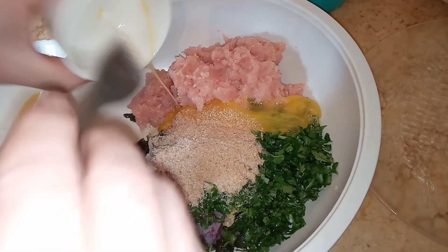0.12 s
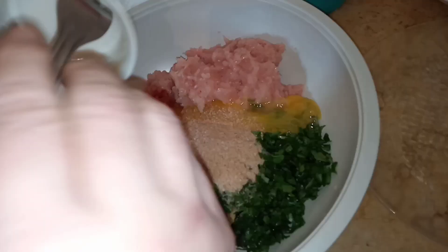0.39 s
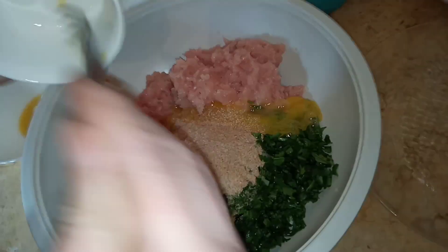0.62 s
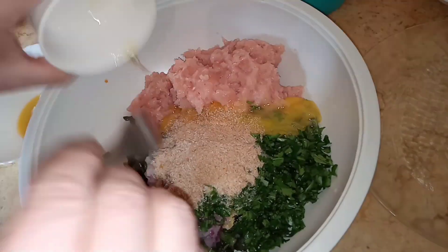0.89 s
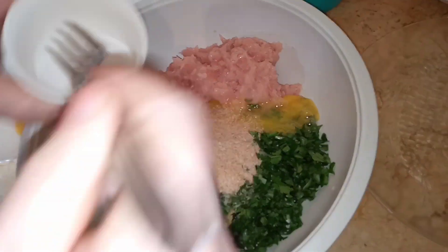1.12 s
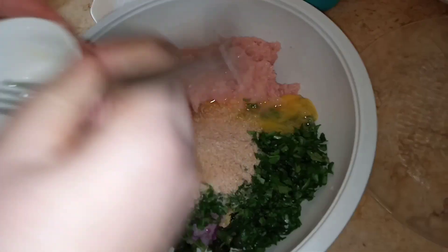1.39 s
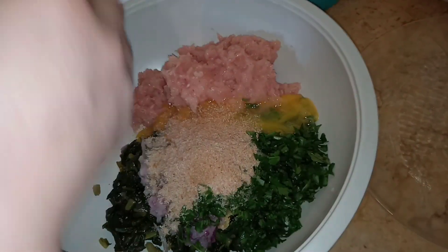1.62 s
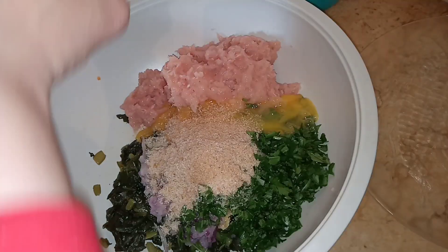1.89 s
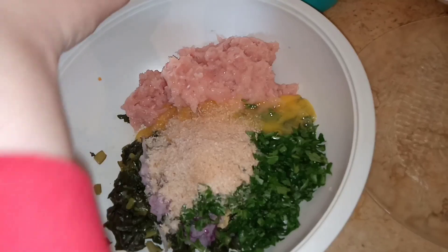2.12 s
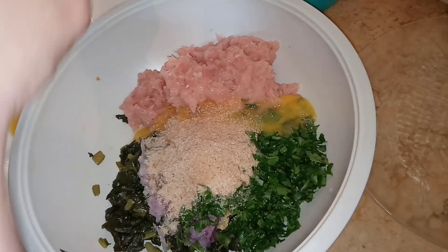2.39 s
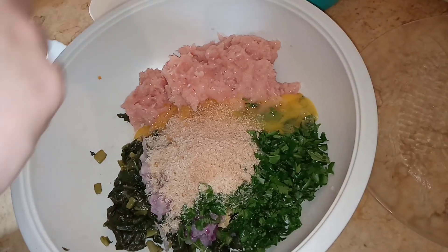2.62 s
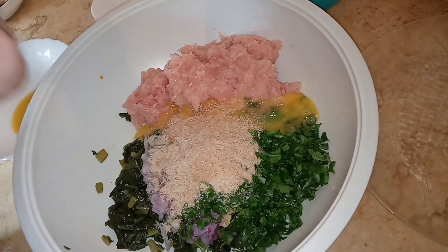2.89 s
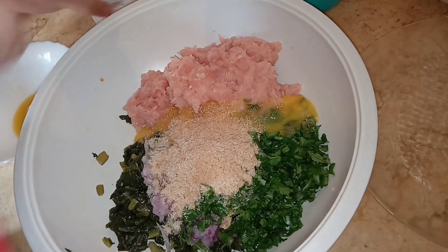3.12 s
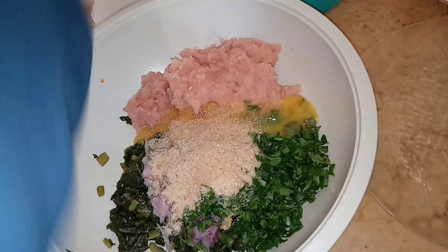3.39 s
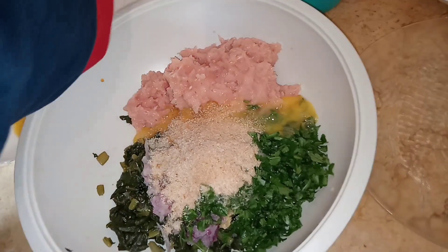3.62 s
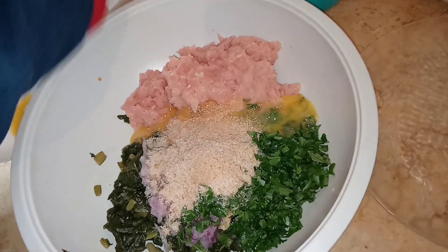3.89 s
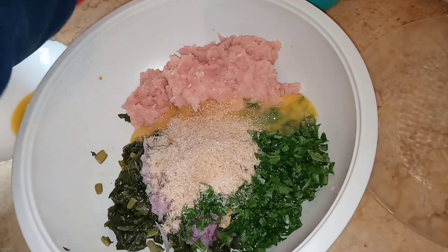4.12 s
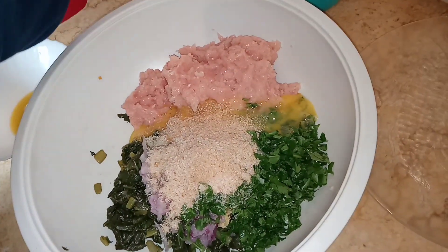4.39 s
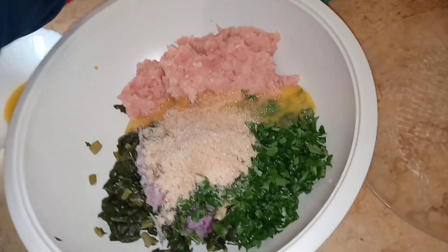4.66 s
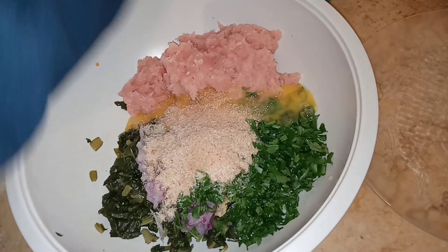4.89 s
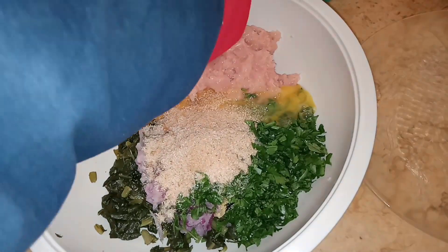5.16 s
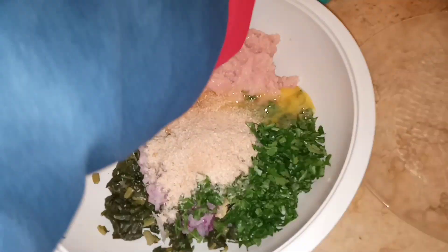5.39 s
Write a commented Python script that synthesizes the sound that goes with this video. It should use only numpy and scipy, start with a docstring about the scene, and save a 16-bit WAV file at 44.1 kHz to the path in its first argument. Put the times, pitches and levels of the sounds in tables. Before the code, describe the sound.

A fork taps and clatters in a ceramic cup, then after a quiet gap dishes knock, scrape and crash on a kitchen counter.

```python
"""Crockery on a kitchen counter

A small hard kitchen heard by a phone on the counter: a fork taps and drops into a ceramic cup, a glass is
set down, a lidded jar is knocked about, a dish is dragged and squeals, a plate clatters down.
Blows are noise bursts plus fading sine modes; rubbing is a train of slips through the same modes.
Room noise is shaped noise; an appliance hums in wavering sines, and a low tone swells and fades."""
import sys
import numpy as np
from scipy import signal
from scipy.fft import rfft, irfft
from scipy.io import wavfile
from scipy.ndimage import uniform_filter1d, minimum_filter1d

SR = 44100
rng = np.random.default_rng(int(sys.argv[2]) if len(sys.argv) > 2 else 0)


def to_linear_factor(level_db):
    """Convert decibel levels (scalar or array-like) to linear amplitude factors."""
    exponent = np.asarray(level_db, float) / 20
    return 10 ** exponent


def wav_record(signal):
    """Record a signal, one row per channel, as 16-bit PCM in the file named by sys.argv[1]."""
    frames = np.transpose(np.atleast_2d(signal))
    bounded = np.clip(frames, -1, 1)
    # unit amplitude maps onto the largest positive 16-bit level
    quanta = np.round(bounded * 32767).astype(np.int16)
    wavfile.write(sys.argv[1], SR, quanta)


N = 243431
T = np.arange(N) / SR

# Ceramic cup resonances. Each row: mean frequency in Hz, relative level in dB, undamped t60 in s.
CUP_MODES = [(1660, -2.5, 0.057), (2420, -3.5, 0.37), (2530, -6.5, 0.12), (5600, -19.5, 0.25),
             (6000, -12, 0.22), (7100, -21, 0.23), (8786, -17, 0.074), (9700, -29.5, 0.16),
             (15430, -26, .08)]


def unit(x):
    """Scaled to rms 1."""
    return x / np.sqrt(np.mean(x ** 2))


def on_log(points, hz):
    """Value of (Hz, value) points at hz, interpolated over log frequency."""
    f, v = np.transpose(points)
    return np.interp(np.log(np.maximum(hz, 1)), np.log(f), v)


def conv(x, h):
    """Convolution cut to the length of x."""
    return signal.fftconvolve(x, h)[:len(x)]


def walk(rate_hz):
    """Random levels held for 1 / rate_hz and slewed twice; rms 1."""
    k = int(SR / rate_hz)
    steps = np.repeat(rng.standard_normal(N // k + 3), k)
    slewed = uniform_filter1d(uniform_filter1d(steps, k), k)
    return unit(slewed[k:N + k])


def room_noise():
    """Soft steady room noise: white noise shaped in the spectrum, its level wavering."""
    # Spectrum. Each row: frequency in Hz, relative density in dB per Hz.
    air_spectrum = [(25, -33), (35, -34), (50, -12.5), (65, -16.5), (85, -1.5), (220, -5.5), (310, -3.5),
                    (450, -9.5), (950, -11.5), (1250, -8.5), (1550, -13), (3150, -20), (3450, -29.5),
                    (4600, -38.5), (5500, -52), (6300, -48), (7600, -52.5), (8500, -47), (9300, -59.5),
                    (16000, -61)]
    # Mean level. Each row: time in s, level in dB.
    air_level = [(0.0, -48), (0.5, -45.5), (3.8, -43.5), (5.52, -44.5)]
    hz = np.arange(N // 2 + 1) * SR / N
    white = rfft(rng.standard_normal(N))
    air = unit(irfft(white * to_linear_factor(on_log(air_spectrum, hz)), N))
    return air * to_linear_factor(np.interp(T, *np.transpose(air_level)) + 1.4 * walk(5.48))


def appliance_hum():
    """Motor hum: sine lines wavering in level and phase."""
    # Hum lines. Each row: frequency in Hz, mean level in dB rms.
    hum_lines = [(147.5, -55), (294, -55.5), (490, -64)]
    out = np.zeros(N)
    for hz, db in hum_lines:
        level = np.sqrt(2) * to_linear_factor(db + 1.5 * walk(5))
        out += level * np.sin(2 * np.pi * hz * T + .4 * walk(4))
    return out


def low_tone():
    """A sinking, wavering low tone and its octave, in Gaussian swells."""
    # Swells. Each row: peak time in s, half width in s (to 1 / e), level in dB.
    swells = [(.05, 0.39, -55.5), (.8, 0.35, -57), (2.0, 0.44, -48.5), (3.15, 0.13, -54), (3.95, 0.4, -51),
              (4.5, 0.22, -65), (4.9, 0.18, -56)]
    # Mean pitch. Each row: time in s, frequency in Hz.
    pitch = [(0, 96), (1.5, 95.4), (3.0, 83.9), (5.52, 69.05)]
    hz = np.interp(T, *np.transpose(pitch)) + 1.176 * walk(1.7)
    phase = 2 * np.pi * np.cumsum(hz) / SR
    swell = sum(to_linear_factor(db) * np.exp(-((T - s) / half_s) ** 2) for s, half_s, db in swells)
    swell = swell * to_linear_factor(2 * walk(9))
    return np.sqrt(2) * swell * (np.sin(phase) + to_linear_factor(-10) * np.sin(2 * phase))


def colour(points, tilt_db=0., size=2048):
    """Causal response with the given spectrum, from the folded cepstrum; energy 1."""
    hz = np.arange(size // 2 + 1) * SR / size
    db = on_log(points, hz) + tilt_db * np.log2(np.clip(hz, 200, 16000) / 2200)
    cep = irfft(db * np.log(10) / 20)
    cep[1:size // 2] *= 2
    cep[size // 2 + 1:] = 0
    h = irfft(np.exp(rfft(cep)))
    return h / np.sqrt(np.sum(h ** 2))


def ring(modes, gain_db, rise_s=0.0038):
    """Sum of fading sines that build up over the contact time."""
    hz, db, t60_s = np.transpose(modes)[:, :, None]
    t = T[:SR // 2]
    sines = to_linear_factor(db + gain_db[:, None] - 60 * t / t60_s) * np.sin(2 * np.pi * hz * t)
    return np.sum(sines, axis=0) * np.sin(np.pi / 2 * np.minimum(t / rise_s, 1)) ** 2


def struck(blows, modes, knock, rise_s, crack_t60_s, body_t60_s, body_db, ring_db, damp_db):
    """Each blow: a short crack, a dull knock dying in the body, and modes woken unevenly by where it lands."""
    detune, scatter_db = 0.0041, 3  # spread between blows: pitch as a fraction, level of each mode
    soft_db, soft_loss = -28, 0.25  # blows under soft_db ring less, by soft_loss dB per dB
    out, t = np.zeros(N + SR), T[:SR // 2]
    hz, db, _ = np.transpose(modes)
    times = np.transpose(blows)[0]
    for s, level_db, tilt_db, best_hz, best_db in blows:
        crack = to_linear_factor(-60 * t / crack_t60_s)
        body = to_linear_factor(body_db - 60 * t / body_t60_s)
        push = rng.standard_normal(len(t)) * (crack + body)
        thud = conv(push * np.minimum(t / rise_s, 1), colour(knock, tilt_db)) / 2

        favour_db = best_db * np.exp(-(np.log2(hz / best_hz) / .08) ** 2)
        wake_db = tilt_db * np.log2(hz / 2200) + favour_db
        wake_db = wake_db + soft_loss * min(level_db - soft_db, 0)
        wake_db = wake_db + scatter_db * rng.standard_normal(len(modes))
        shift = np.ones((len(modes), 3))
        shift[:, 0] += detune * rng.standard_normal(len(modes))
        tone = ring(modes * shift, wake_db, 2 * rise_s)

        # every later contact takes some of this ringing away
        later = np.searchsorted(times[times > s], s + t).astype(float)
        tone = tone * to_linear_factor(-damp_db * uniform_filter1d(later, size=128))
        tone = tone / np.sqrt(np.sum(to_linear_factor(db) ** 2))
        i = int(s * SR)
        out[i:i + len(t)] += to_linear_factor(level_db) * (thud + to_linear_factor(ring_db) * tone)
    return out[:N]


def cup():
    """Ceramic cup: blows wake its modes."""
    # Each row: start in s, level in dB, brightness in dB per octave, favoured pitch in Hz, favour in dB.
    cup_blows = [(.402, -22.5, 5.5, 2410, 4), (.4786, -11, 0, 2610, 9), (.4834, -13.5, -3.5, 2410, -1),
                 (.5114, -35, -11.5, 2420, -3)]
    # Knock through body and counter. Each row: frequency in Hz, relative density in dB per Hz.
    cup_knock = [(88, -51), (150, -17), (333, -24), (879, -24.5), (2150, -8), (2460, 3), (2930, -16),
                 (8540, -26.5), (12000, -36), (15600, -39)]
    return struck(cup_blows, CUP_MODES, cup_knock, rise_s=0.00076, crack_t60_s=0.032, body_t60_s=0.047,
                  body_db=-14.5, ring_db=-18.5, damp_db=1.7)


def counter():
    """Short low booms of the worktop, each a pair of fading sines; three of the four lie under blows."""
    # Each row: start in s, frequency in Hz, level in dB, t60 in s.
    thumps = [(.48, 272, -28, 0.076), (1.327, 70, -35, 0.072), (1.955, 347, -34, 0.13),
              (5.357, 113, -18.5, 0.042)]
    out = np.zeros(N + SR)
    for s, hz, db, t60_s in thumps:
        pair = [(hz, db, t60_s), (1.21 * hz, db - 10.0, t60_s)]
        i = int(s * SR)
        out[i:i + SR // 2] += ring(pair, np.zeros(2), 0.0053)
    return out[:N]


def room(x):
    """Dense reflections from hard walls, each octave fading at its own rate; energy 1."""
    # Each row: frequency in Hz, t60 in s.
    room_t60 = [(300, 0.61), (1000, 0.66), (2500, 0.55), (6000, 0.43), (14000, 0.23)]
    gap_s, rise_s = 0.0038, 0.0049
    t, tail = T[:int(.7 * SR)], 0
    for hz in 125 * 2. ** np.arange(8):
        edges_hz = [hz / np.sqrt(2), min(hz * np.sqrt(2), 20000)]
        band = signal.butter(2, edges_hz, "band", fs=SR, output="sos")
        noise = signal.sosfilt(band, rng.standard_normal(len(t)))
        tail = tail + noise * to_linear_factor(-60 * t / on_log(room_t60, hz))
    tail = tail * np.clip((t - gap_s) / rise_s, 0, 1)
    return conv(x, tail / np.sqrt(np.sum(tail ** 2)))


def fork():
    """Fork rattling in the cup: blows wake the modes of both."""
    # Each row: start in s, level in dB, brightness in dB per octave, favoured pitch in Hz, favour in dB.
    fork_blows = [(1.3151, -23, 0.5, 1179, 12), (1.3242, -9, 6, 1534, 33), (1.3343, -11, -1.1, 2700, 9),
                  (1.3517, -12, 1.5, 2700, 3), (1.3721, -18, 0.5, 5992, 6), (1.5825, -35.5, -1, 8500, 3),
                  (1.6816, -33.5, -3.5, 6000, -6), (1.7562, -32, -2.5, 8786, 6), (1.766, -37, -1, 6000, 3),
                  (1.7746, -33.5, -1.5, 1660, 21)]
    # Each row: mean frequency in Hz, relative level in dB, undamped t60 in s.
    fork_modes = [(1179, 6, 0.13), (1534, -13, 0.052), (1790, -7, 0.09), (2401, 9, 0.22), (2740, -1, 0.2),
                  (2834, -3, 0.12), (2990, -15, 0.058), (3030, 2.5, 0.2), (3284, -6, 0.17),
                  (4700, -13, .15), (5992, -12, 0.24), (8500, -8, 0.067), (10430, -25, 0.16),
                  (14600, -22, 0.093), (14900, -25, .1)]
    # Knock. Each row: frequency in Hz, relative density in dB per Hz.
    fork_knock = [(59, -66), (100, -23.5), (881, -12), (1160, -8.5), (1340, -20), (1490, -6.5), (1890, -9),
                  (2480, -0.5), (3630, -18.5), (8630, -31.5), (9390, -49), (15600, -56)]
    return struck(fork_blows, fork_modes + CUP_MODES, fork_knock, rise_s=0.0011, crack_t60_s=0.037,
                  body_t60_s=0.24, body_db=-13.5, ring_db=-10.5, damp_db=5.3)


def glass():
    """Glass set down: a few close blows wake its modes."""
    # Each row: start in s, level in dB, brightness in dB per octave, favoured pitch in Hz, favour in dB.
    glass_blows = [(3.742, -15, .1, 7031, -1), (3.7514, -17.5, 0.7, 3429, -4), (3.763, -32, -.6, 3095, 1),
                   (3.798, -28.5, -0.6, 1650, -4)]
    # Each row: mean frequency in Hz, relative level in dB, undamped t60 in s.
    glass_modes = [(623, -1, 0.13), (1390, -12, 0.12), (1650, 4, .12), (2480, 0.5, 0.078),
                   (3095, -10, 0.068), (3429, 1.5, 0.12), (4753, -5.5, 0.15), (4960, -17, 0.24),
                   (7031, -14.5, 0.29), (9200, -17.5, 0.076), (10250, -35, 0.15), (11700, -34, 0.073),
                   (12900, -34, .1), (14500, -34, .08)]
    # Knock. Each row: frequency in Hz, relative density in dB per Hz.
    glass_knock = [(180, -43), (300, -8.5), (1040, -11.5), (1160, -13), (1420, 0), (2940, -7.5),
                   (3470, -13), (5690, -30), (7170, -33), (15600, -84)]
    return struck(glass_blows, glass_modes, glass_knock, rise_s=0.00064, crack_t60_s=0.045, body_t60_s=0.2,
                  body_db=-11, ring_db=-7.5, damp_db=3.1)


def rubbed(strokes, modes, knock, slips_per_s, spread_db, patchy_db, split_hz, low_db, high_db):
    """Dense uneven slips, bunched in patches, knock the body and keep low and high modes singing unequally."""
    chance = rng.random((2, N))
    size = to_linear_factor(-spread_db * np.log(1 - .97 * chance[1]))
    slips = unit((chance[0] < slips_per_s / SR) * size * to_linear_factor(patchy_db * walk(120)))
    press = np.zeros(N)
    for s, length_s, start_db, end_db in strokes:
        db = start_db + (end_db - start_db) * np.clip((T - s) / length_s, 0, 1)
        press += to_linear_factor(db) * ((T >= s) & (T < s + length_s))
    drive = slips * press

    low = np.transpose(modes)[0] < split_hz
    scale = np.sqrt(np.sum(ring(np.array(modes)[low], np.zeros(low.sum())) ** 2))
    singing = ring(modes, np.where(low, low_db, high_db)) / scale
    return conv(drive, colour(knock)) + conv(drive, singing)


def jar():
    """Lidded jar knocked about: blows and short rattles through the same modes."""
    # Each row: start in s, level in dB, brightness in dB per octave, favoured pitch in Hz, favour in dB.
    jar_blows = [(4.3468, 2, 1.3, 4768, 32), (4.3873, -14, -1.5, 1740, 18.5), (4.4407, -2, 4, 2600, 4),
                 (4.4478, -18, 9, 3360, 5), (4.566, -7.5, -2.5, 1810, 12.5), (4.5744, -9, -2, 1810, 3),
                 (4.6524, -8.5, -2, 3120, 14), (4.66, -10.5, -2, 2124, 19), (4.7003, -17.5, -1.5, 7440, 4),
                 (4.7337, -1, -0.3, 2374, 12), (4.741, -2.5, -0.5, 2556, 17), (4.758, -21, -3, 2374, -3),
                 (4.8225, -10.5, -1.5, 1430, -2), (4.8443, -15.5, 3.5, 10200, 5)]
    # Each row: start in s, length in s, level at the start in dB, level at the end in dB.
    jar_rattle = [(4.356, 0.066, -21, -26), (4.655, 0.079, -25.5, -20.5), (4.745, 0.1, -22, -43),
                  (4.822, 0.074, -26.5, -42.5)]
    # Each row: mean frequency in Hz, relative level in dB, undamped t60 in s.
    jar_modes = [(1430, -5.5, 0.13), (1740, -2.5, .2), (1769, 0, 0.24), (1810, 6, 0.086),
                 (2124, 2.5, 0.095), (2374, -1, 0.095), (2600, 3.5, 0.083), (2880, -1, 0.045),
                 (3120, -2, 0.066), (3360, 2.5, 0.18), (4768, -26, 0.16), (7040, -23, 0.11),
                 (7440, -26.5, 0.087), (10200, -32, 0.12), (12900, -37, .1)]
    # Knock through body and counter. Each row: frequency in Hz, relative density in dB per Hz.
    jar_knock = [(100, -31), (500, -13), (980, -16), (1430, -1), (2530, -2), (3500, -10), (4200, -25),
                 (5200, -27), (5900, -45.5), (7400, -31.5), (8800, -49.5), (10300, -52.5), (12000, -62),
                 (15600, -54.5)]
    blows = struck(jar_blows, jar_modes, jar_knock, rise_s=0.00061, crack_t60_s=0.027, body_t60_s=0.2,
                   body_db=-14.5, ring_db=-16, damp_db=7.1)
    return blows + rubbed(jar_rattle, jar_modes, jar_knock, slips_per_s=2500, spread_db=1.8, patchy_db=3.3,
                          split_hz=4000, low_db=-4.5, high_db=-10)


def squeal():
    """Slips locked onto one dish mode, given as a clean faded sine."""
    # One row: start in s, length in s, frequency in Hz, level in dB rms.
    squeal_tone = (5.285, .07, 2480, -23)
    start_s, length_s, hz, db = squeal_tone
    rise_s, fall_s = .025, .006
    fade = np.clip(np.minimum((T - start_s) / rise_s, (start_s + length_s - T) / fall_s), 0, 1)
    return np.sqrt(2) * fade * to_linear_factor(db) * np.sin(2 * np.pi * hz * T)


def dish():
    """Dish dragged over the counter: blows, slips through the same modes, and a squeal."""
    # Each row: start in s, level in dB, brightness in dB per octave, favoured pitch in Hz, favour in dB.
    dish_blows = [(5.0357, -17.5, -1.2, 2470, -7), (5.044, -5.5, 1.6, 6800, 7.5),
                  (5.0528, -8, 1.7, 8490, 8.5), (5.0789, -9.5, -1.3, 6800, 9),
                  (5.0935, -10.5, -1.4, 2470, -2), (5.1148, -13.5, -1, 5840, 21),
                  (5.1304, -10, -1.7, 2470, 12.5), (5.1497, -11, -1.3, 8490, 8),
                  (5.158, -5.5, 0.4, 2470, 6.5), (5.1704, -7.5, 0.23, 2470, 2.5),
                  (5.1977, -21.5, 1.4, 8490, 21)]
    # Each row: start in s, length in s, level at the start in dB, level at the end in dB.
    dish_drag = [(5.05, .16, -25.5, -18.5), (5.21, 0.11, -23.5, -35.5)]
    # Each row: mean frequency in Hz, relative level in dB, undamped t60 in s.
    dish_modes = [(1713, -16, 0.046), (1890, -10, 0.12), (2170, -2.5, 0.086), (2470, 3, 0.14),
                  (3120, -10.5, 0.094), (3860, -24, 0.09), (3930, -27, 0.18), (5040, -28, 0.066),
                  (5400, -28, 0.1), (5580, -36, 0.12), (5840, -27.5, 0.33), (6800, -20, 0.07),
                  (7740, -33, 0.059), (8490, -22, 0.085), (9500, -39, .08), (10260, -26, 0.064),
                  (10400, -28, 0.05), (10500, -31, .06), (12700, -32.5, .07), (12750, -39, .07),
                  (14300, -31, .07), (14900, -28, .07), (15300, -35, .07)]
    # Knock through body and counter. Each row: frequency in Hz, relative density in dB per Hz.
    dish_knock = [(35, -62), (60, -56), (377, -14), (1130, -18.5), (1490, -1.5), (2210, -5.5), (2430, 0.5),
                  (4240, -32), (6010, -47), (6440, -45), (6910, -34), (7410, -37.5), (15600, -56)]
    blows = struck(dish_blows, dish_modes, dish_knock, rise_s=0.0017, crack_t60_s=0.051, body_t60_s=0.15,
                   body_db=-21.5, ring_db=-8.5, damp_db=2.5)
    drag = rubbed(dish_drag, dish_modes, dish_knock, slips_per_s=1500, spread_db=2.4, patchy_db=2.7,
                  split_hz=3600, low_db=-21, high_db=-1)
    return blows + squeal() + drag


def plate():
    """Plate clattering down: blows and short drags through the same modes."""
    # Each row: start in s, level in dB, brightness in dB per octave, favoured pitch in Hz, favour in dB.
    plate_blows = [(5.3564, 2, -0.8, 8490, 9), (5.3777, -7.5, -1.5, 3120, 12.5),
                   (5.3883, -3, -1.4, 2480, -9), (5.4072, -6.5, -2, 7630, 20), (5.418, -3.5, 0, 5060, 15.5),
                   (5.445, -25, -9, 1890, 1), (5.47, -6.5, -1.9, 3930, 23), (5.5104, -11.5, -0.5, 2080, 1)]
    # Each row: start in s, length in s, level at the start in dB, level at the end in dB.
    plate_drag = [(5.362, .115, -12.5, -22.5), (5.477, 0.047, -32, -30)]
    # Each row: mean frequency in Hz, relative level in dB, undamped t60 in s.
    plate_modes = [(1430, -2.5, 0.08), (1890, 1, 0.071), (1920, -14, 0.073), (2080, -13, 0.052),
                   (2480, 7, 0.066), (3080, -8, .1), (3120, 0, 0.11), (3460, -8.5, 0.14), (3930, -23, 0.34),
                   (4960, -26, .1), (5060, -18, 0.08), (6800, -27, 0.11), (7440, -26, 0.099),
                   (7630, -21.5, 0.102), (8490, -22, 0.13), (10250, -23.5, 0.094), (12300, -34, .1),
                   (12900, -45, .08), (14300, -34, 0.11)]
    # Knock. Each row: frequency in Hz, relative density in dB per Hz.
    plate_knock = [(35, -62), (60, -38), (292, -26.5), (328, -28), (377, -20.5), (424, -21), (1130, -23),
                   (1920, -2.5), (3210, -13), (6150, -38), (7580, -23.5), (9140, -48), (15600, -50)]
    blows = struck(plate_blows, plate_modes, plate_knock, rise_s=0.00094, crack_t60_s=0.028,
                   body_t60_s=0.039, body_db=-10.5, ring_db=-10.5, damp_db=4.4)
    return blows + rubbed(plate_drag, plate_modes, plate_knock, slips_per_s=3000, spread_db=2.6,
                          patchy_db=2.1, split_hz=3600, low_db=-3.5, high_db=-1.5)


def scene():
    """Every vessel sounds in the same room over the background."""
    near = cup() + fork()
    far = glass() + jar() + dish() + plate()
    wet = room(to_linear_factor(-12) * near + to_linear_factor(-8.5) * far)
    # band limits of the microphone path
    top = signal.ellip(8, .2, 50, 15600, fs=SR, output="sos")
    bottom = signal.butter(2, 60, "high", fs=SR, output="sos")
    hits = signal.sosfilt(top, near + far + wet) + counter()
    background = room_noise() + appliance_hum() + low_tone()
    return (signal.sosfilt(bottom, hits) + background)[None]


def roll_off(x):
    """The treble ends steeply here."""
    return signal.sosfilt(signal.butter(12, 16820, fs=SR, output="sos"), x)


def record(dry):
    """A look-ahead limiter turns down just before loud peaks and lets go slowly; tanh rounds the peaks."""
    ahead, top, release_s = int(0.015 * SR), to_linear_factor(-7.5), .05
    need = np.minimum(1, top / (np.abs(dry[0]) + 1e-9)) ** 0.17  # soft ratio
    hold = minimum_filter1d(need, size=ahead, origin=-(ahead // 2))
    fall = np.exp(-1 / (release_s * SR))
    released = signal.lfilter([1 - fall], [1, -fall], hold - 1) + 1
    gain = uniform_filter1d(np.minimum(hold, released), size=256)
    mix = np.tanh(dry * gain * 0.76) / 0.79
    return roll_off(mix)


dry = scene()
out = record(dry)
wav_record(out)
```